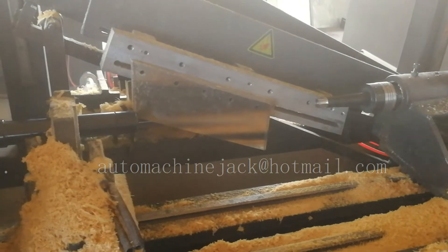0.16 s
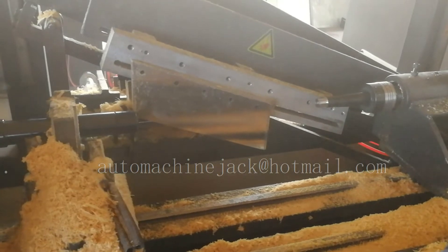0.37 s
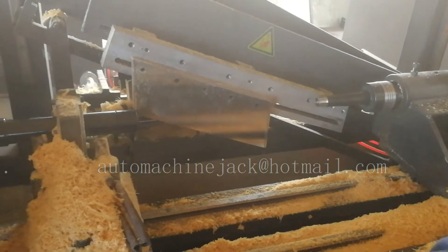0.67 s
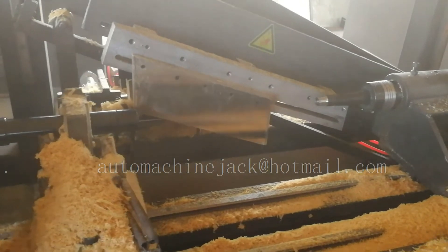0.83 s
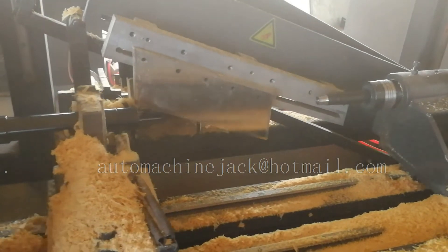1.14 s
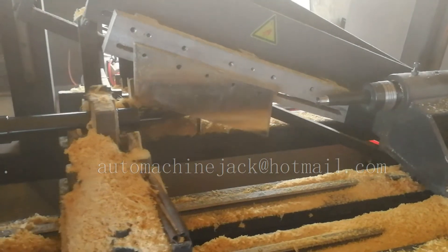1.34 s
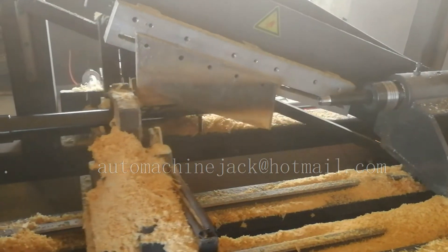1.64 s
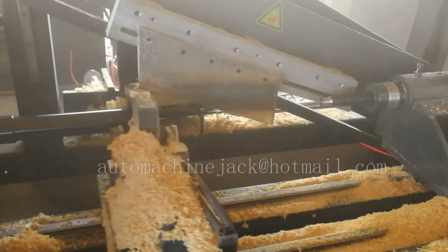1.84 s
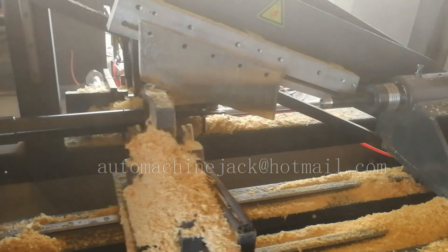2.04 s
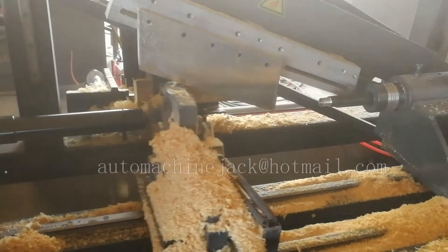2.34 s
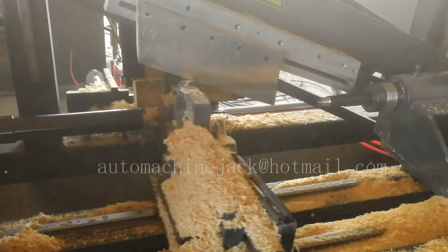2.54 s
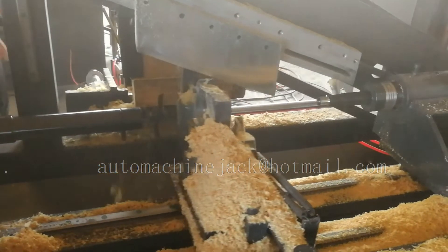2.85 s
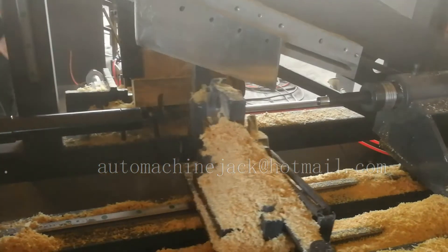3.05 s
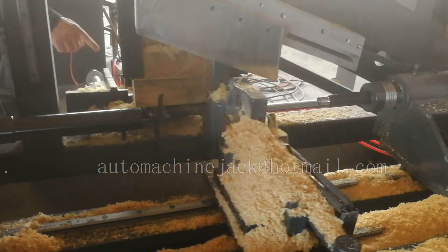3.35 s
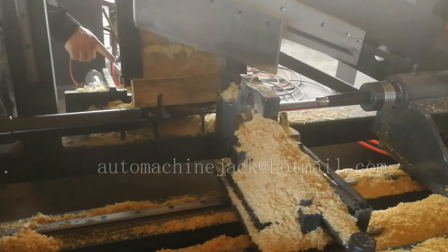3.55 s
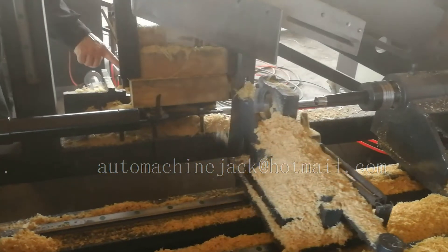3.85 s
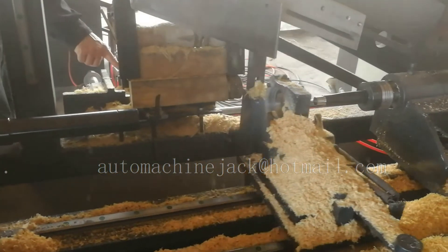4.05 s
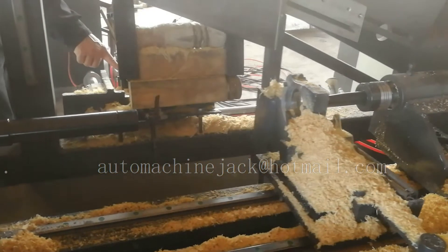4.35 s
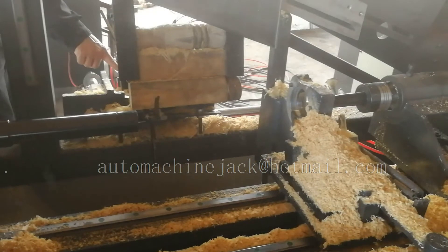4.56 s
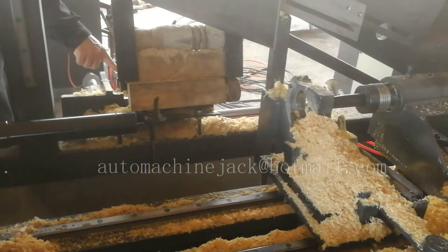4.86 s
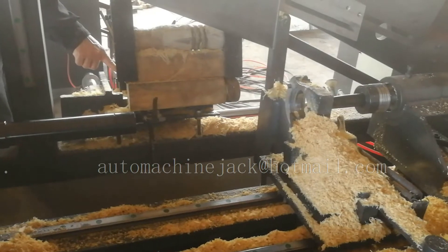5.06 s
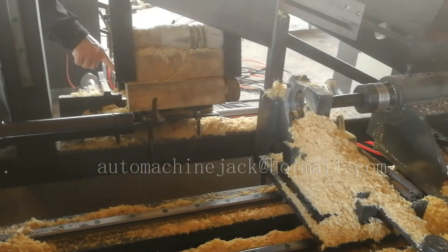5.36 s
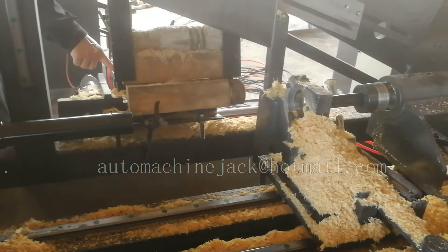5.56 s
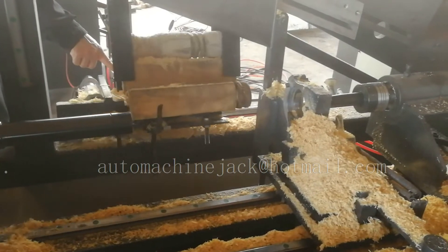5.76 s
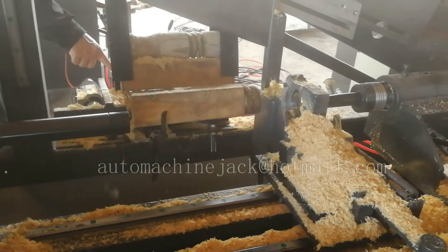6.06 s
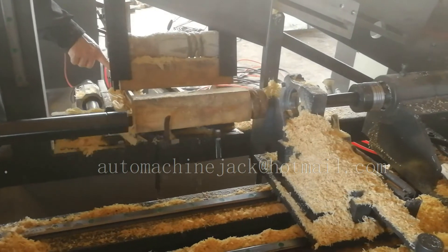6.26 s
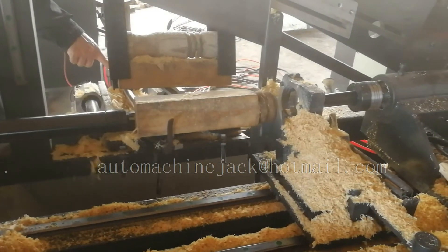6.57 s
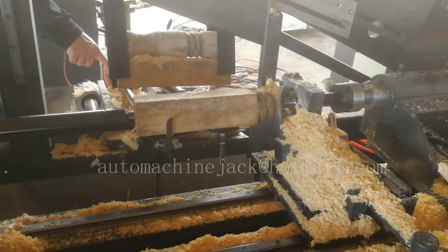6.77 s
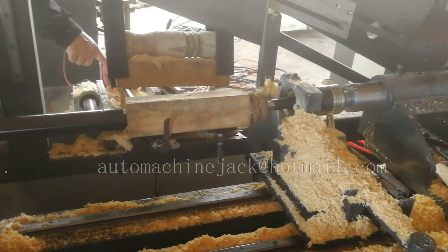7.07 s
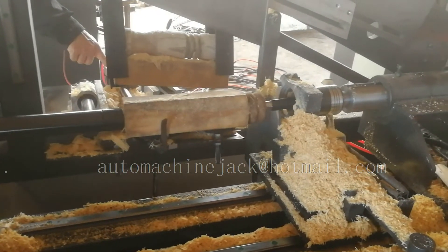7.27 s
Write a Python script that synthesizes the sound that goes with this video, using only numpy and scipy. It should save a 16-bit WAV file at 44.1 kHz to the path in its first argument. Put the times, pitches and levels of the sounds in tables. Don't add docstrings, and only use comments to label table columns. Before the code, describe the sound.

A double knock and dry squeal, then an automatic lathe carriage roars and rattles, brakes, and sharp air blasts hiss as a blank is clamped.

```python
import sys
import numpy as np
from scipy import signal
from scipy.fft import rfft, irfft, next_fast_len
from scipy.io import wavfile
from scipy.ndimage import uniform_filter1d, map_coordinates

SR = 44100
rng = np.random.default_rng(int(sys.argv[2]) if len(sys.argv) > 2 else 0)


def generate_wav(signal):
    frames = np.transpose(np.atleast_2d(signal))
    scaled = np.clip(frames, -1, 1) * 32767
    pcm = np.round(scaled).astype(np.int16)
    wavfile.write(sys.argv[1], SR, pcm)


def volts_from_decibels(level):
    exponent = np.asarray(level, float) / 20
    return 10 ** exponent


N = 326781
T = np.arange(N) / SR
VALVE_OPENS, VALVE_SHUTS = 5.272, 7.15


def unit(x):
    return x / np.sqrt(np.mean(np.atleast_2d(x).mean(0) ** 2) + 1e-20)


def along(points, hz):
    f, v = np.transpose(points)
    return np.interp(np.log(hz + 1), np.log(f + 1), v)


def curves(rows):
    s, *cols = np.vstack(rows).T
    return [np.interp(T, s, c) for c in cols]


def window(rows, fade):
    inside = np.minimum(T - rows[0][0], rows[-1][0] - T)
    return np.clip(inside / fade + 1, 0, 1)


def wobble(rate):
    knots = rng.standard_normal(int(N * rate / SR) + 4)
    return map_coordinates(knots, [T * rate])


def filtered(x, response):
    m = next_fast_len(N + 8192)
    hz = np.fft.rfftfreq(m, 1 / SR)
    return irfft(rfft(x, m) * response(hz), m)[..., :N]


# f/Hz, likeness
PORT_LIKENESS = [(30, 0.87), (60, 0.934), (200, 1), (400, 0.71), (1000, 0.317), (8000, 0.41), (15000, 0.25)]


def rush(spectrum, lag_ms, patchy_db, peaks=(), grit_db=0, ripple_db=3.0):
    grain = rng.standard_normal((2, N)) * volts_from_decibels(grit_db * wobble(700))
    z = signal.stft(grain, nperseg=512)[2]
    field = rng.standard_normal(z.shape[1:])
    field = uniform_filter1d(uniform_filter1d(field, size=5, axis=0), size=12, axis=1)
    patchy = signal.istft(z * volts_from_decibels(patchy_db * field / field.std()), nperseg=512)[1][:, :N]
    m = next_fast_len(N)
    a, b = rfft(patchy, m)
    hz = np.fft.rfftfreq(m, 1 / SR)
    ripple = np.interp(hz, np.arange(900) * 25., rng.standard_normal(900))
    resonances = sum(db / (1 + (2 * (hz - c) / w) ** 2) for c, w, db in peaks)
    gain = volts_from_decibels(along(spectrum, hz) + ripple_db * ripple + resonances)
    alike = np.clip(along(PORT_LIKENESS, hz), 0, .99)
    shared = alike * np.exp(-2j * np.pi * hz * lag_ms / 1000)
    right = shared * a + np.sqrt(1 - alike ** 2) * b
    gain = gain / np.sqrt(1 + shared.real)
    return unit(irfft(gain * np.array([a, right]), m)[:, :N])


def fuzzy_line(hz, blur_hz, clear, apart):
    turn = np.exp(2j * np.pi * np.cumsum(hz * np.ones(N)) / SR)
    both, left, right = [wobble(blur_hz) + 1j * wobble(blur_hz) for _ in range(3)]
    smear = clear + both + apart * np.array([left, right])
    return unit(np.real(smear * turn))


def glide(rows, blur_hz, clear, apart=1):
    hz, db = curves(rows)
    return volts_from_decibels(db) * window(rows, 0.0325) * fuzzy_line(hz, blur_hz, clear, apart)


def burst(s, db, rise, t60, tail_db, tail_t60):
    t, out = T[:SR // 2], np.zeros(N + SR)
    fall = volts_from_decibels(db - 60 * t / t60)
    tail = volts_from_decibels(db + tail_db - 60 * t / tail_t60)
    out[round(s * SR):][:len(t)] = (1 - np.exp(-t / rise)) * (fall + tail)
    return out[:N]


def swells(rows):
    levels = []
    for s, db, build, lose in rows:
        drop = np.where(T < s, (s - T) / abs(build), (T - s) / abs(lose))
        levels.append(volts_from_decibels(db - 20 * drop))
    return np.max(levels, axis=0)


# t/s, jet level/dB
AIR_FLOW = [(5.37, -28), (5.66, -24.5), (6.0, -28.5), (6.52, -29), (6.68, -34), (7.126, -36.5),
            (7.174, -47.5), (7.32, -58.5)]


def ducking():
    jet_db, = curves(AIR_FLOW)
    return volts_from_decibels(-0.078 * (jet_db - jet_db[-1]) * (T > VALVE_OPENS))


# t/s, effort level/dB
CARRIAGE_EFFORT = [(0.0, -30), (0.41, -26.5), (0.78, -12.5), (1.2, -6), (1.36, -1), (1.9, 0), (4.38, 0),
                   (4.53, -8.5), (4.74, -31.5), (4.9, -34.5)]


def effort(full_db, grows, rest_db):
    working = volts_from_decibels(full_db + grows * curves(CARRIAGE_EFFORT)[0]) * (T < VALVE_OPENS)
    return working + volts_from_decibels(rest_db) * ducking()


# f/Hz, level/dB per Hz
HALL_COLOUR = [(15, -38), (25, -19.5), (50, -1), (76, -3), (97, 1.5), (114, -5.5), (170, 1.5), (229, -7.5),
               (270, -7.5), (350, -7), (540, -27), (936, -22), (1700, -43), (6050, -31), (11000, -20.5),
               (11900, -36.5), (16000, -27)]
# f/Hz, width/Hz, level/dB
DISTANT_MACHINES = [(950, 80, 9.5), (1320, 70, 7.5)]


def hall():
    return volts_from_decibels(-55) * ducking() * rush(HALL_COLOUR, 0, patchy_db=0.0, peaks=DISTANT_MACHINES)


# t/s, motor field f/Hz, carrier level/dB
DRIVE_RUN = [(.17, 1.35, -72.5), (.25, 5.5, -60.5), (.5, 20, -55), (.9, 44.7, -49), (1.2, 58.7, -55),
             (1.5, 80, -60.5), (1.8, 120, -72.5), (2.1, 92.5, -86)]
# multiple of the field, level/dB
DRIVE_SIDEBANDS = [(0, 1), (1, 5.5), (-1, -24.5), (5, -6.5), (-5, 1.5)]


def drive():
    carrier_hz = 10000
    field_hz, db = curves(DRIVE_RUN)
    field = 2 * np.pi * np.cumsum(field_hz) / SR
    lines = 0
    for k, level in DRIVE_SIDEBANDS:
        strength = volts_from_decibels(level + 3.7 * np.array([wobble(12.06), wobble(11.14)]))
        lines = lines + strength * np.sin(2 * np.pi * carrier_hz * T + k * field)
    half = volts_from_decibels(-10.5) * fuzzy_line(carrier_hz / 2, blur_hz=120.5, clear=0.48, apart=1)
    return volts_from_decibels(db) * window(DRIVE_RUN, .02) * (lines + half)


MODE_HZ = [175.1, 202.2, 260.65]
MODE_FULL_DB = [-61.5, -78.5, -68]
MODE_STILL_DB = [-79, -70.5, -96.5]
# t/s of the top, level/dB, build t/s per 20 dB, loss t/s per 20 dB
MODE_SWELLS = [
    [(0.0, -33.5, 0.5, 0.29), (1.25, -42.5, .5, -0.2), (2.06, -48.5, -3, 0.2), (2.78, -44, 0.28, 0.36),
     (3.45, -43, 0.43, 2.45), (4.19, -33.5, 0.8, 0.28), (4.62, -42, 1.2, -0.02), (5.75, -47.5, -0.35, 0.27),
     (6.62, -40, -0.09, 0.4)],
    [(0.0, -52.5, -0.62, -0.96), (.7, -46, -0.04, 2.12), (1.0, -41.5, -1, 2.34), (1.22, -39.5, 0.53, -0.57),
     (1.55, -47.5, .6, 1.0), (4.48, -26.5, 0.18, 0.26), (4.62, -37, 0.36, 0.15), (5.77, -40.5, 0.01, 0.28),
     (6.2, -52, 0.86, 1.04)],
    [(0.0, -41, -2.3, .5), (.95, -42.5, 0.49, 0.34), (1.24, -46, 0.34, -1.5), (1.95, -44, 1.12, -0.93),
     (2.45, -39, 0.19, 0.2), (2.8, -45, 1.26, -2.17), (3.95, -31.5, 0.29, 0.8), (4.17, -33, 0.79, -0.19),
     (4.5, -40, -0.67, -0.7), (5.45, -50.5, -0.09, 0.71), (6.56, -43.5, -0.02, 0.08)],
]
# t/s, level/dB, build t/s per 20 dB, loss t/s per 20 dB
BED_JOLTS = [
    (0.0, -56, .1, 0.4),
    (.09, -46, -0.03, 0.2534),
    (2.75, -48, -0.48, 0.61),
    (4.62, -50.5, 1.18, 0.12),
    (5.3, -56, -0.58, 1.28),
    (5.73, -44.5, -0.04, 0.25),
    (6.55, -36, 0.04, 0.1118),
    (6.62, -47.5, 0.1667, .5),
]
# t/s, f/Hz, level/dB
BED_SHUDDER = [(2.8, 98.37, -49), (2.95, 94, -44), (3.3, 88.76, -49), (3.65, 84.36, -52)]
# f/Hz, level/dB per Hz
RUMBLE_COLOUR = [(15, -50), (25, -29.5), (50, -15), (129, -2), (183, -0.5), (259, -2.5), (290, 0),
                 (380, -18.5), (640, -120)]


def frame():
    modes = 0
    for rows, db, rest_db, hz in zip(MODE_SWELLS, MODE_FULL_DB, MODE_STILL_DB, MODE_HZ):
        envelope = swells(rows) + effort(db, 0.93, rest_db)
        modes = modes + envelope * fuzzy_line(hz, blur_hz=23.998, clear=1.43, apart=0.245)
    shudder = glide(BED_SHUDDER, blur_hz=23.15, clear=0.28, apart=0.13)
    shaking = effort(full_db=-49, grows=0.362, rest_db=-62) + volts_from_decibels(-2.5) * swells(BED_JOLTS)
    return modes + shudder + shaking * rush(RUMBLE_COLOUR, 0, patchy_db=4.0, ripple_db=-0.5)


# t/s, level/dB, build t/s per 20 dB, loss t/s per 20 dB
GUIDE_PULLS = [
    (0.0, -63, .1, -4.2),
    (.09, -40.5, -0.51, 0.74),
    (.21, -41, -0.14, .5),
    (.3, -44.5, 0.57, .5),
    (.38, -41, 0.17, 0.1),
    (.5, -49.5, 1, 3.25),
    (.62, -43, 0.63, 1.14),
    (.78, -47, 0.82, 1),
]
# f/Hz, level/dB per Hz
DRAG_COLOUR = [(410, -45.5), (700, -31), (854, -15.5), (1040, -5), (1230, -7), (1480, 2.5), (1790, -8.5),
               (2000, -12), (2200, -39), (2510, -32), (2960, -8), (3640, -31.5), (4670, -44.5), (5090, -35),
               (5500, -49), (7150, -78), (12100, -120)]
# t/s, f/Hz, level/dB
STROKE_FADING = [
    [(0.0, 3500, -60), (.06, 3450, -65.5)],
    [(0.0, 1600, -55.5), (.07, 1550, -54)],
]
# t/s, level/dB, build t/s per 20 dB, loss t/s per 20 dB
LAST_PUSH = [
    (7.335, -47, .06, .6),
    (7.38, -43, .2, .6),
]
# f/Hz, level/dB per Hz
PUSH_COLOUR = [(300, -70.5), (600, -23), (950, 1), (1400, -5), (1860, -5), (2200, -28), (2650, -10),
               (3300, -32.5)]
# t/s, f/Hz, level/dB
GUIDE_SQUEAL = [(.12, 1948, -47.5), (.45, 1879, -58.5), (.7, 1698, -61.5)]


def slides():
    pulls = swells(GUIDE_PULLS) * volts_from_decibels(0.39 * wobble(40.2))
    drag = pulls * rush(DRAG_COLOUR, 0.216, patchy_db=1.5, grit_db=2.0)
    fading = sum(glide(rows, blur_hz=402, clear=0) for rows in STROKE_FADING)
    push = swells(LAST_PUSH) * rush(PUSH_COLOUR, 0.28, patchy_db=5.5, grit_db=-1.0)
    return drag + fading + push + glide(GUIDE_SQUEAL, blur_hz=89.5, clear=0.29)


# f/Hz, level/dB per Hz
ROAR_COLOUR = [(460, -22), (780, -7.5), (1260, -1.5), (1370, -0.5), (1510, 1.5), (2050, -9), (2210, -7),
               (2690, -6), (4050, -10), (4890, -10), (6000, -21.5), (7800, -42.5), (13200, -120)]
RATTLE_COLOUR = [(3530, -52.5), (6000, -14.5), (7250, -11), (7740, -3.5), (8540, -1), (9350, -10.5),
                 (10100, -13), (10900, -19.5), (13200, -18.5), (15200, -25.5), (16000, -21)]
DRONE_COLOUR = [(170, -20), (290, -2), (344, -2.5), (459, -4), (666, -7.5), (780, -7), (1010, -13),
                (1720, -120)]
# f/Hz, width/Hz, level/dB
BED_RESONANCES = [(910, 77, 4.5), (1515, 45, -0.5), (2280, 75, 2.5), (2614, 87, -1), (8030, 380, 0.22)]
# t/s, peak level/dB
BALL_PUFFS = [(0.2448, -51.5), (0.3194, -43.5), (0.4044, -48.5), (0.4703, -35), (0.5472, -35.5),
              (0.6494, -41), (0.7427, -47.5), (0.8494, -35.5), (0.9448, -21.5), (1.03, -16.5),
              (1.1802, -34.5), (1.213, -26.5)]
# t/s, f/Hz, level/dB
SCREW_ORDERS = [
    [(1.9, 1480, -48), (2.3, 1469, -52.5), (2.7, 1512, -42), (3.2, 1563, -51.5), (3.7, 1637, -47),
     (4.3, 1568, -57.5)],
    [(2.8, 1170, -46), (3.2, 1201, -47.5), (3.65, 1262, -46.5), (4.0, 1237, -65.5), (4.35, 1195, -51)],
    [(1.3, 4943, -57.5), (2.6, 4910, -55), (4.4, 4950, -56.5)],
]
# t/s, f/Hz, level/dB
BROAD_WHINE = [(1.4, 962, -49.5), (1.7, 880, -42), (1.9, 752.5, -42.5), (2.1, 612, -44),
               (2.3, 519.7, -48.5)]
SLOWING_WHINE = [(2.2, 510, -51.5), (2.5, 474, -42), (2.75, 431.9, -49.5), (2.87, 402, -37),
                 (3.1, 379.3, -38.5), (3.3, 343.1, -43.5), (3.6, 300.8, -44), (3.9, 267.9, -41.5)]
# t/s, f/Hz, level/dB
SHAFT_CLIMB = [(1.35, 190.1, -56), (1.55, 205.5, -57.5), (1.85, 239.9, -46.5), (2.3, 266.6, -56.5),
               (2.7, 300.6, -44), (2.8, 303.4, -55)]
BED_GROAN = [(3.4, 780, -48.5), (3.65, 795, -41), (4.0, 829.4, -47.5), (4.1, 830, -57)]


def carriage():
    moving = T < VALVE_OPENS
    puffs = sum(burst(s, 0.588 * db - 25.5, 0.0017, 0.077, -31.5, 0.28) for s, db in BALL_PUFFS)
    roar = effort(full_db=-35, grows=0.907, rest_db=-104) * volts_from_decibels(0.795 * wobble(7.95))
    roar = roar * rush(ROAR_COLOUR, 0.6527, patchy_db=0.69, peaks=BED_RESONANCES, grit_db=1.0)
    rattle = moving * effort(full_db=-34, grows=1.247, rest_db=-65) * volts_from_decibels(0.24 * wobble(29.97)) + puffs
    rattle = rattle * rush(RATTLE_COLOUR, 0.636, patchy_db=2.0, peaks=BED_RESONANCES, grit_db=2.0)
    drone = effort(full_db=-43, grows=1, rest_db=-72.5) + swells(BED_JOLTS)
    drone = drone * rush(DRONE_COLOUR, 0.532, patchy_db=2.0, peaks=[(320.4, 30.0, -4.0)])
    orders = sum(glide(rows, blur_hz=59.88, clear=0.19) for rows in SCREW_ORDERS)
    whine = glide(BROAD_WHINE, blur_hz=229.1, clear=0.098) + glide(SLOWING_WHINE, blur_hz=60.09, clear=1.07)
    groan = glide(BED_GROAN, blur_hz=130.7, clear=0.194)
    climb = glide(SHAFT_CLIMB, blur_hz=22.066, clear=1.0)
    return moving * roar + rattle + drone + orders + whine + groan + climb


# f/Hz, t60/s
HALL_DECAY = [(200, 0.55), (2000, 0.37), (10000, 0.097)]


def room(x):
    hz, t, z = signal.stft(rng.standard_normal((2, SR // 2)), SR, nperseg=256)
    decay = volts_from_decibels(-60 * t / along(HALL_DECAY, hz)[:, None])
    tail = signal.istft(z * decay, SR, nperseg=256)[1]
    delayed = np.pad(x, (150, 0))[None]
    return signal.fftconvolve(delayed, tail / np.linalg.norm(tail[0]), axes=1)[:, :N]


# t/s, peak level/dB, ring f/Hz, t60/s
STOP_KNOCKS = [(0.0845, -19.5, 1435, 0.0148), (0.085, -24, 1070, 0.0163), (.085, -42.5, 6330, 0.0176),
               (0.0985, -25, 6140, 0.01), (0.085, -32, 1681, 0.14), (.1, -31, 1482, 0.21),
               (0.0984, -14.5, 7965, 0.0166), (.099, -32.5, 3820, 0.0153), (0.0993, -5.5, 740, 0.00507),
               (1.37, -31.5, 457, 0.081), (2.615, -26.5, 4843, 0.056), (2.668, -29, 1493, 0.254),
               (2.707, -22, 5013, 0.029), (2.711, -27.5, 2596, 0.03), (2.708, -25.5, 1143, .03),
               (2.716, -25, 2193, 0.097), (2.713, -23, 5320, .03), (2.742, -26, 2610, 0.048),
               (2.756, -30, 595, 0.036), (2.745, -27, 1106, 0.083), (2.804, -28.5, 1264, 0.021),
               (2.776, -32.5, 297, 0.032), (2.843, -32.5, 300, 0.025), (2.722, -27.5, 3375, 0.047),
               (2.726, -20, 2393, 0.039), (2.743, -33.5, 2350, 0.053), (2.749, -32.5, 3400, 0.0073),
               (2.759, -28, 1965, 0.028), (2.764, -25, 882, 0.037), (2.801, -30, 5430, 0.038),
               (2.814, -35.5, 3324, 0.15), (2.825, -26.5, 260, 0.036), (5.281, -11.5, 193, 0.0221),
               (5.2846, -17, 5800, 0.031), (5.286, -13.5, 8800, 0.031), (5.293, -10, 5970, 0.0185),
               (5.297, -19.5, 3980, 0.147), (5.307, -16, 8800, 0.04), (5.727, -9.5, 950, 0.0145),
               (6.525, -27, 897, 0.07), (6.548, -22.5, 946, 0.07), (6.5545, -9, 5370, 0.049),
               (6.555, -23.5, 8300, 0.057), (6.559, -12.5, 5417, 0.0235), (6.5644, -7.5, 5550, 0.0207),
               (6.563, -16.5, 8270, .05), (6.564, -19.5, 4054, 0.11)]
# t/s, level/dB, rise/s, t60/s, tail level/dB, tail t60/s
WOOD_TUMBLE = [
    (2.707, -29, 0.00194, 0.297, -10, 0.39),
    (2.722, -33, .002, 0.183, -14, .3),
    (2.742, -35, 0.0027, 0.21, -14.5, .3),
    (2.8, -38, .003, 0.0664, -13, 0.19),
    (5.727, -30, 0.00205, 0.156, -7, 0.36),
]
# f/Hz, level/dB per Hz
WOOD_COLOUR = [(200, -26.5), (400, -11.5), (758, -10.5), (1080, 0), (1470, -8.5), (2200, -0.5), (3160, -6),
               (3410, -3.5), (3800, -5.5), (5360, -9.5), (5850, -21.5), (8000, -7), (10400, -43),
               (17600, -120)]


def knocks():
    rings = np.zeros(N + SR)
    t = T[:SR // 2]
    for s, db, hz, t60 in STOP_KNOCKS:
        pair = np.sin(2 * np.pi * hz * t) + 0.346 * np.sin(2 * np.pi * 1.08 * hz * t)
        onset = 1 - np.exp(-t * hz * 1.24)
        rings[round(s * SR):][:len(t)] += volts_from_decibels(db - 60 * t / t60) * onset * pair
    rings = rings[:N]
    clatter = sum(burst(*row) for row in WOOD_TUMBLE) * rush(WOOD_COLOUR, 0.267, patchy_db=-1.5, grit_db=0.5)
    return rings + volts_from_decibels(-12.0) * room(rings) + clatter


# t/s, level/dB, rise/s, t60/s, tail level/dB, tail t60/s
RELEASE_BLAST = (5.2835, -11.5, .002, .19, -17, .5)
CLAMP_BLAST = (6.5535, -14, .003, .15, -12, .5)
# f/Hz, level/dB per Hz
PIPE_COLOUR = [(440, -50.5), (620, -36), (750, -18.5), (847, -15), (951, -8.5), (1300, -7), (1540, -6),
               (1750, -1), (2120, -5.5), (2550, -5), (3000, -6), (3900, -18), (6600, -120)]
JET_COLOUR = [(1760, -34), (3000, -16), (3520, -9), (4080, -3), (4930, -2.5), (5480, -6.5), (6170, -6),
              (6810, -3.5), (7400, -6), (8050, -4), (9270, -1.5), (10500, -14), (12400, -16),
              (16000, -24.5)]
RELEASE_COLOUR = [(210, -42.5), (350, -25), (674, -35.5), (943, -20), (1140, -34.5), (1880, -20),
                  (2170, -25), (2420, -16), (3450, -9.5), (3920, -7), (4380, -9.5), (5750, -2), (7310, -7),
                  (8850, -1.5), (16000, -30)]
CLAMP_COLOUR = [(880, -26.5), (1500, -22), (2100, -25.5), (2860, -17.5), (3730, -12), (4000, -9),
                (5120, -8), (5660, -2.5), (6240, -13), (8400, -4.5), (10100, -17), (14900, -25.5),
                (16000, -32.5)]
# f/Hz, width/Hz, level/dB
MUFFLER_RESONANCES = [(950, 64, 5.7), (2565, 83, 6.3), (3793, 56, 2.34), (4025, 23, 9.2), (4160, 30, 5.3),
                      (4370, 19.3, 8.2), (4460, 58, 10), (4827, 24.6, 7.1), (5150, 36, 4.4),
                      (5435, 65, 6.2), (6280, 40, 4.6), (7002, 69, 12.3), (7820, 63, 3.2), (9130, 42, 4.1),
                      (9497, 150, 5.5)]
PIPE_LEVELS = [-9.5, -7.5]
# f/Hz, level/dB
CLAMPED_TILT = [(3000, 0.5), (3600, 6), (4200, -2), (4900, -1), (9500, -3), (11000, -3), (14000, 3.5)]
SHUT_TILT = [(2500, 9), (4200, 4.5), (6000, -3.5), (12000, -10)]
# t/s, f/Hz, level/dB
RELEASE_WHISTLE = [(5.3, 1930, -44), (5.35, 1900, -39.5), (5.39, 1860, -36), (5.46, 1808, -33.5),
                   (5.515, 1829, -43), (5.56, 1870, -31.5), (5.6, 1835, -46), (5.7, 1800, -39.5),
                   (5.74, 1811, -46.5)]
CLAMP_WHISTLE = [(6.58, 2080, -42.5), (6.61, 1950, -37), (6.65, 1870, -39), (6.69, 1850, -41.5),
                 (6.73, 1780, -52.5)]
LAST_WHISTLE = [(6.86, 1403, -48.5), (6.92, 1412, -40), (6.96, 1380, -43), (7.01, 1355, -37.5),
                (7.09, 1317, -47), (7.16, 1276, -49.5)]
LONG_WHISTLE = [(5.53, 1708, -47.5), (5.6, 1731, -45), (5.7, 1732, -41), (5.77, 1695, -41),
                (5.85, 1691, -45), (6.1, 1660, -47.5), (6.35, 1641, -44), (6.52, 1638, -49)]
# t/s, f/Hz, level/dB
CHUCK_RING = [(6.59, 5610, -34), (6.63, 5668, -37.5), (6.66, 5666, -34.5), (6.68, 5520, -40.5),
              (6.695, 5670, -40.5), (6.72, 5590, -43), (6.76, 5680, -42.5)]


def exhaust():
    jet_db, = curves(AIR_FLOW)
    before_clamp = T < CLAMP_BLAST[0]
    opened = np.interp(T, VALVE_OPENS + np.array([0, .002, .011, .02]), [0, .45, .55, 1])
    pipe = volts_from_decibels(jet_db + np.where(before_clamp, *PIPE_LEVELS))
    pipe = pipe * rush(PIPE_COLOUR, 0.841, patchy_db=1.77, peaks=MUFFLER_RESONANCES)
    jet = volts_from_decibels(jet_db + 0.176 * wobble(26))
    jet = jet * rush(JET_COLOUR, 0.7576, patchy_db=1.26, peaks=MUFFLER_RESONANCES, grit_db=-0.85)
    shut = np.clip((T - VALVE_SHUTS) / 0.028, 0, 1)
    clamped = filtered(jet, lambda hz: volts_from_decibels(along(CLAMPED_TILT, hz)))
    echo = filtered(jet, lambda hz: volts_from_decibels(along(SHUT_TILT, hz)))
    jet = np.where(before_clamp, jet, (1 - shut) * clamped + shut * echo)
    release = burst(*RELEASE_BLAST) * rush(RELEASE_COLOUR, 0.766, patchy_db=1.0, grit_db=1.5)
    clamp = burst(*CLAMP_BLAST) * rush(CLAMP_COLOUR, -0.42, patchy_db=1.0, grit_db=2.5)
    whistles = glide(RELEASE_WHISTLE, blur_hz=55, clear=3.1, apart=0.52)
    whistles = whistles + glide(CLAMP_WHISTLE, blur_hz=129.8, clear=0.84)
    whistles = whistles + glide(LAST_WHISTLE, blur_hz=69.9, clear=1.24)
    whistles = whistles + glide(LONG_WHISTLE, blur_hz=60, clear=1.45)
    chuck = glide(CHUCK_RING, blur_hz=221.9, clear=0.4)
    return opened * (pipe + jet) + release + clamp + whistles + chuck


def ported(x, balance):
    def response(hz):
        tilt = volts_from_decibels(np.array([[.5], [-.5]]) * along(balance, hz))
        return tilt / np.sqrt(np.mean(tilt ** 2, 0))
    return filtered(x, response)


# f/Hz, left minus right level/dB
MACHINE_BALANCE = [(60, 3), (99, -0.5), (160, -1), (270, 1), (450, 2.5), (740, 6), (1220, 0.5), (2010, 4.5),
                   (3330, 3), (5500, -4.5), (9080, 17.5), (15000, -4.5)]
AIR_BALANCE = [(60, -2), (99, 1), (160, 4), (270, 7), (450, -6), (740, 2.5), (1220, -2), (2010, 6.5),
               (3330, 2.5), (5500, -7), (9080, 12), (15000, -5)]


def scene():
    air = hall() + drive() + exhaust()
    machine = frame() + slides() + carriage() + knocks()
    return ported(machine, MACHINE_BALANCE) + ported(air, AIR_BALANCE)


def low_pass(x):
    return signal.sosfilt(signal.butter(12, 16860, fs=SR, output="sos"), x)


def record(dry):
    clipped = np.clip(dry, -.9, .9)
    mix = filtered(clipped, lambda hz: hz < 15850)
    return low_pass(mix)


dry = scene()
out = record(dry)
generate_wav(out)
```